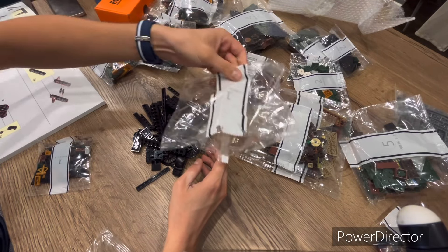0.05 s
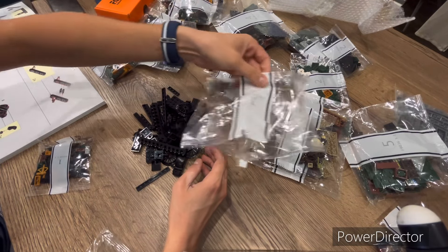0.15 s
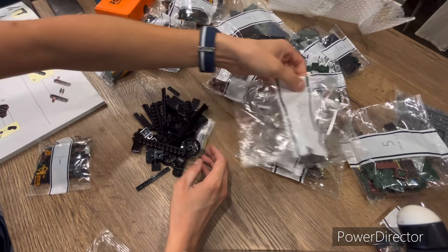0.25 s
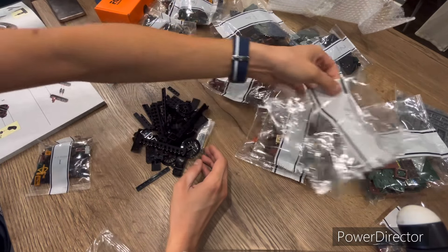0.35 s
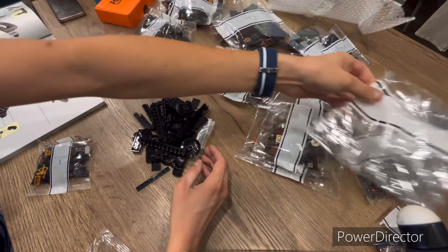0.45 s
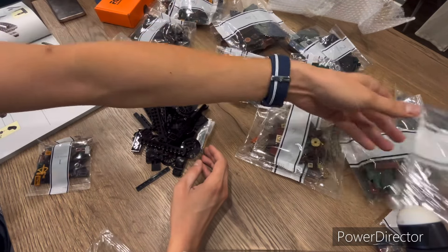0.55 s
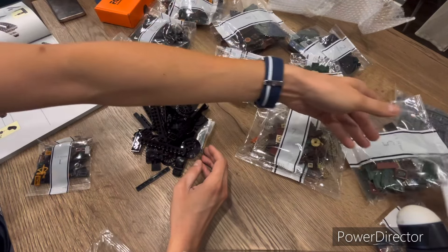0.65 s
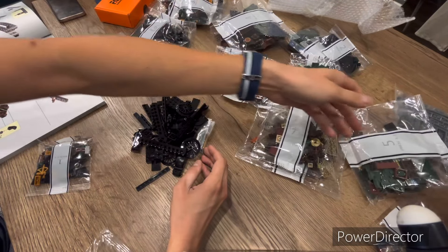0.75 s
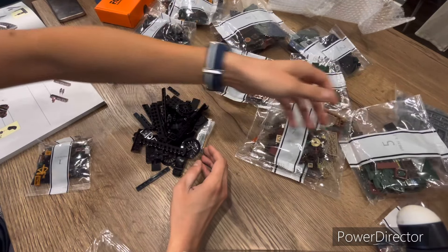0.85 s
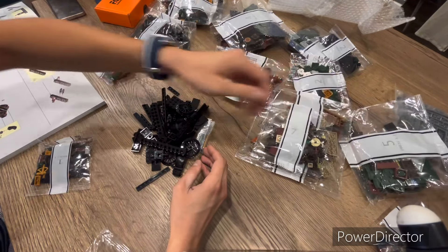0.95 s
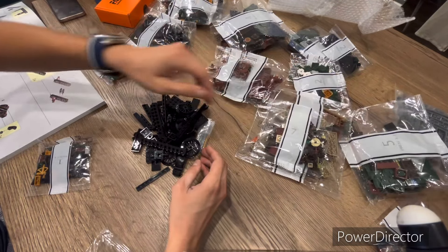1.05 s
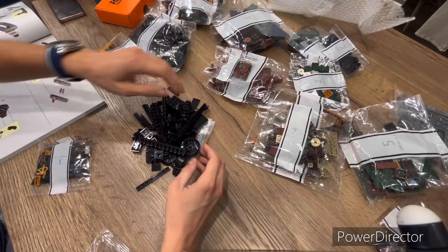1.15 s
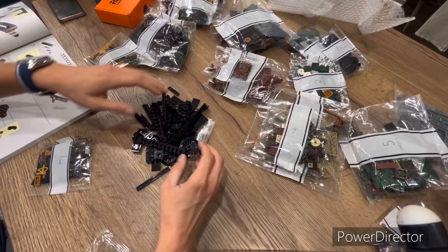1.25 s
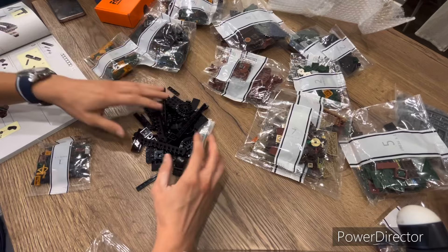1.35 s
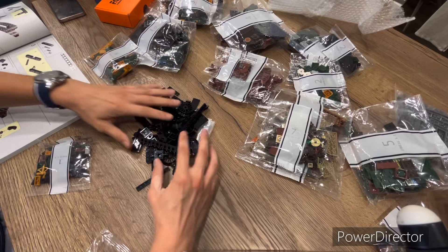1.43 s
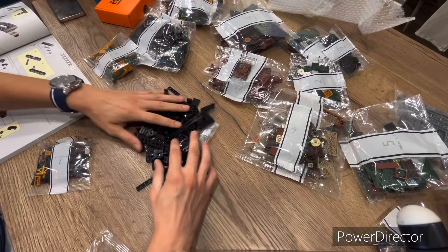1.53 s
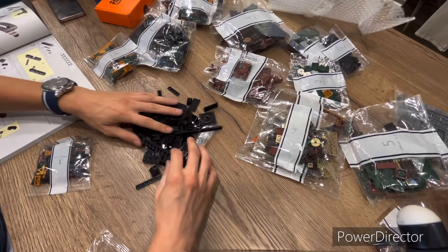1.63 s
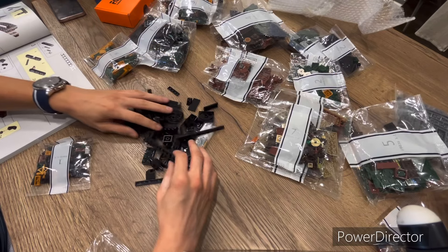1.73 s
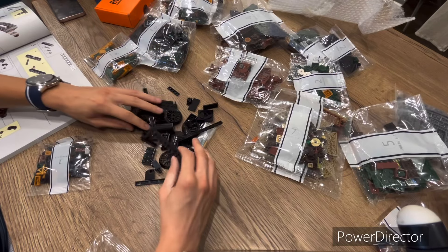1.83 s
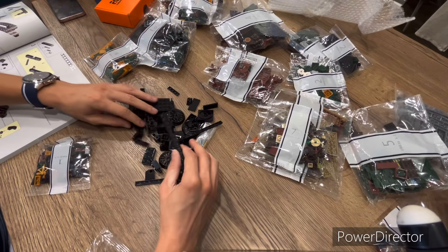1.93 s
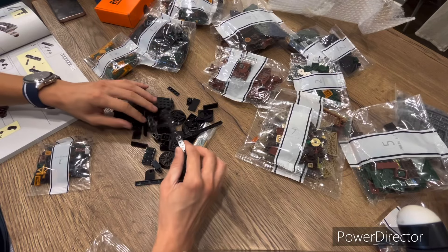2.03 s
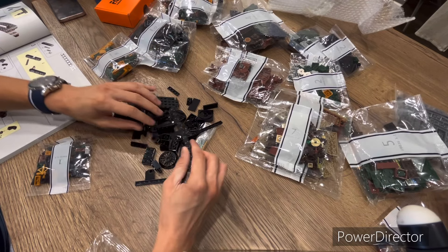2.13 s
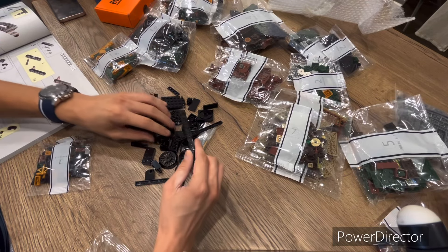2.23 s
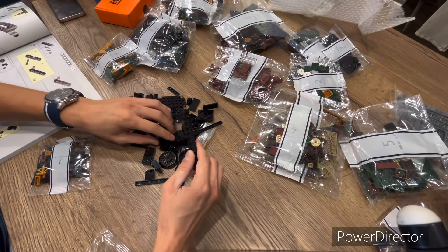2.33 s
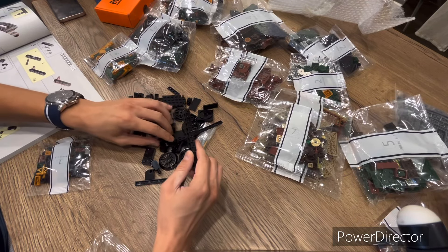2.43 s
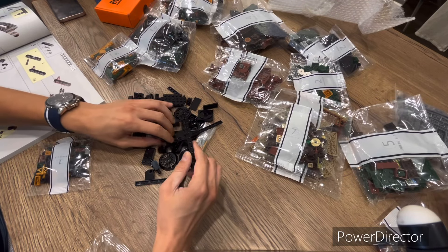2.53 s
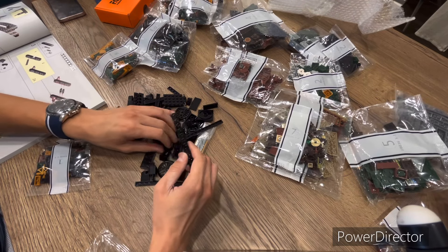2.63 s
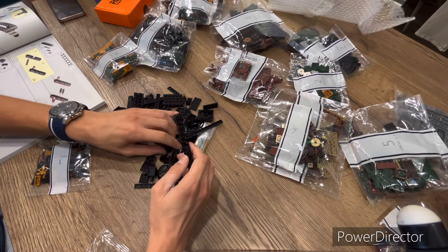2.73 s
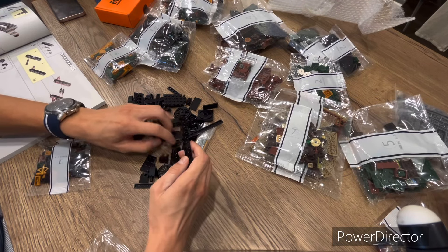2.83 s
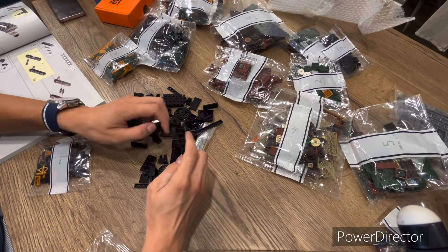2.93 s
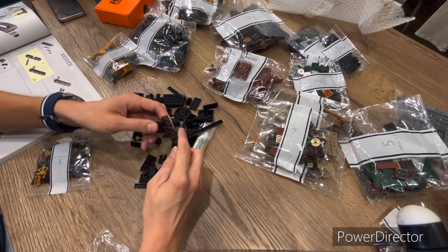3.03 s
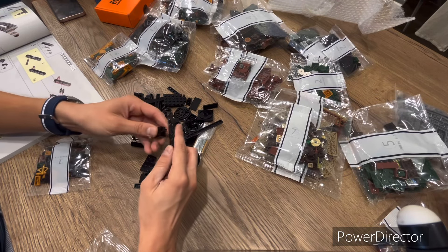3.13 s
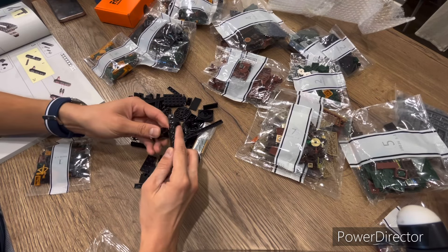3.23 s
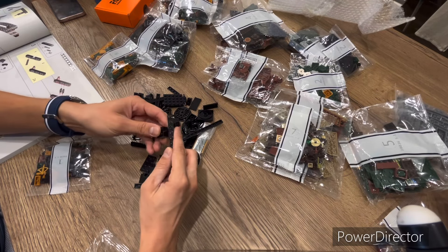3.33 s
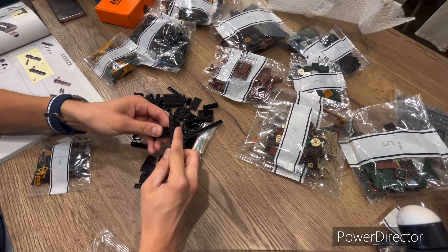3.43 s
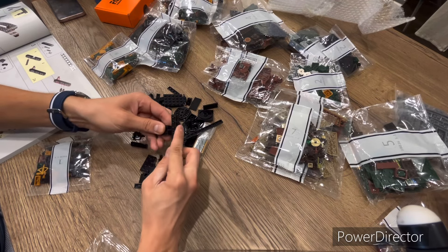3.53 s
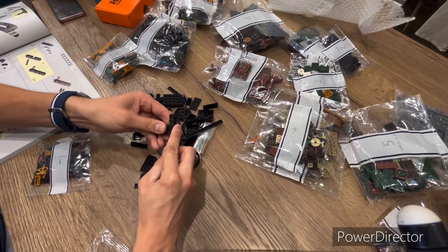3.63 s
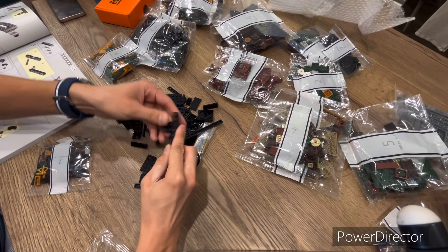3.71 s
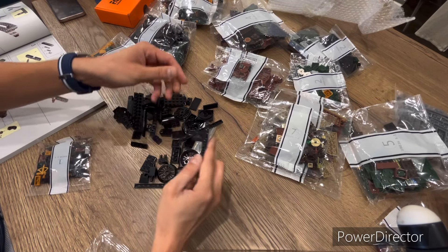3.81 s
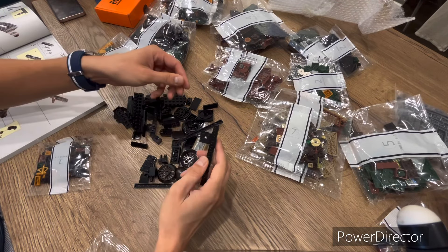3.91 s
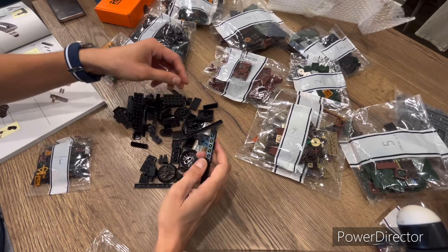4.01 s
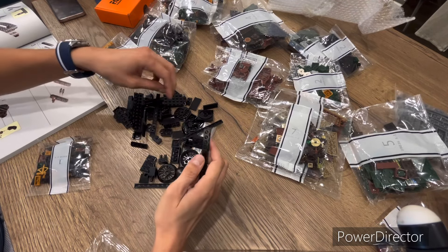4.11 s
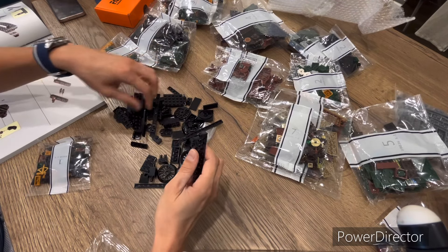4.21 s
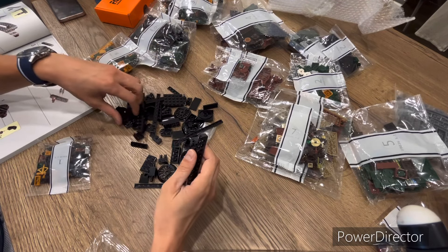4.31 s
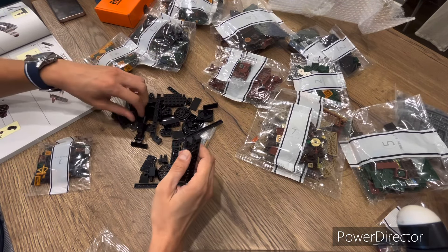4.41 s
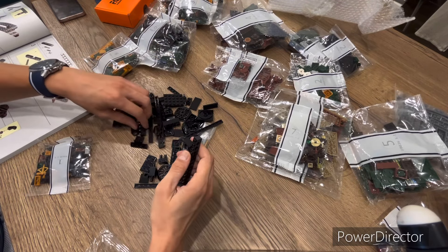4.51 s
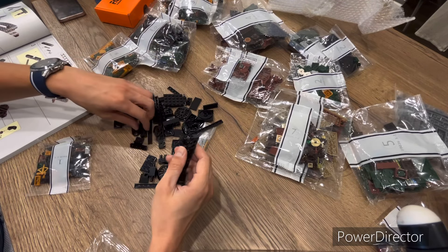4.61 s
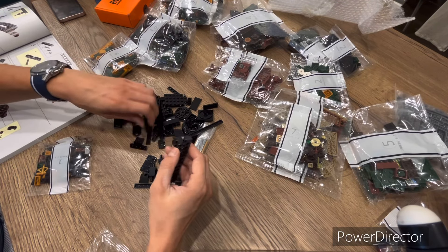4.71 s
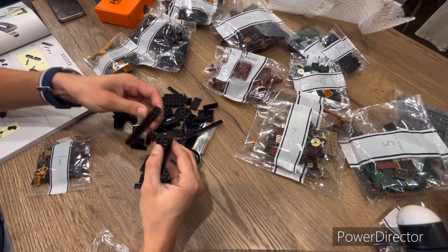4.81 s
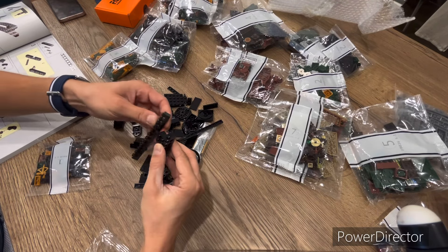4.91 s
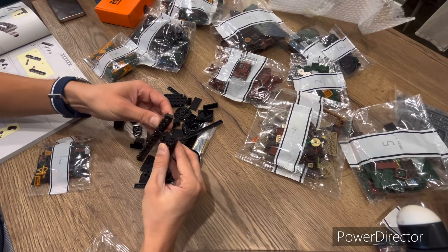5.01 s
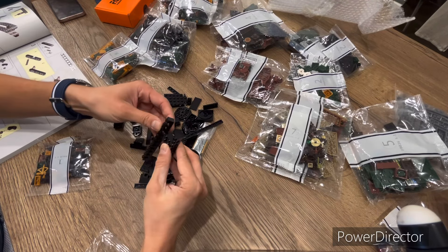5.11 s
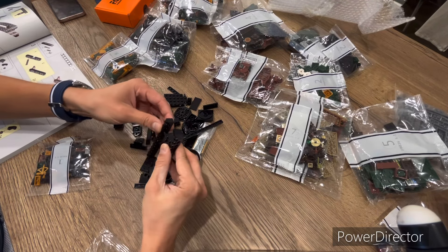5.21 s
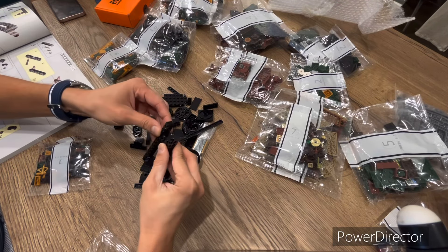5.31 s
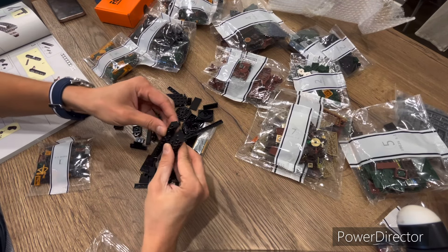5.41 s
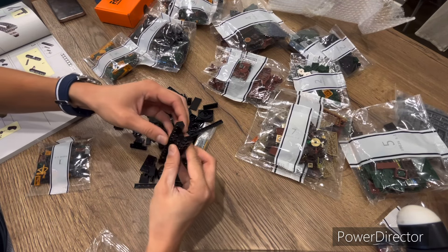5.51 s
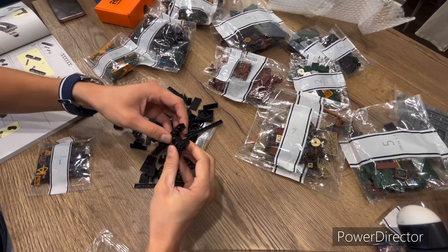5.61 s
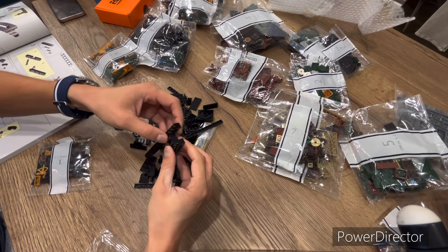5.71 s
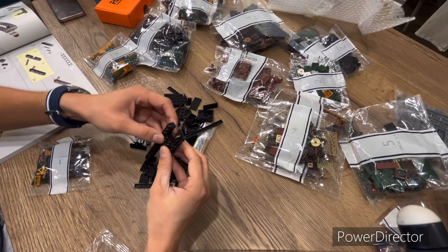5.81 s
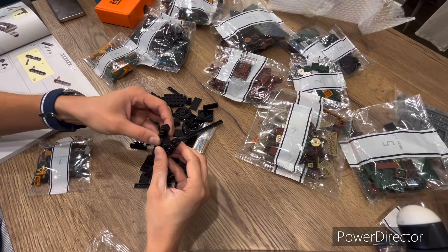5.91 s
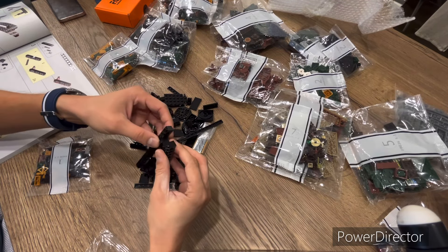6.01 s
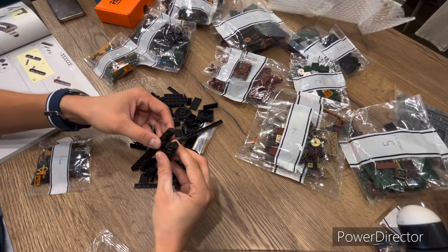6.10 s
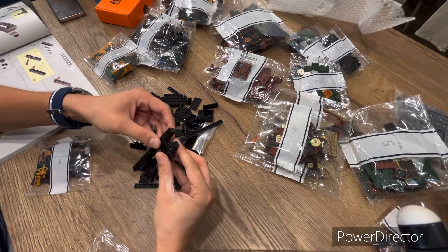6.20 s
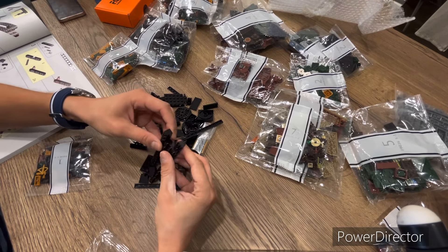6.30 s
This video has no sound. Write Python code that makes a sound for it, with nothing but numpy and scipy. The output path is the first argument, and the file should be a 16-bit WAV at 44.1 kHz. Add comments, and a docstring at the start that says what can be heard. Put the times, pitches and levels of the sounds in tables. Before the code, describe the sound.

Indoors, close to a wooden table, in a small room with a short diffuse tail. From 0 to 0.4 s an emptied thin plastic bag crackles in several sharp, crisp bursts; a dull tap at about 0.47 s and a soft low bump near 0.6 s follow, with more crinkling until 0.95 s. A lull holds only weak film rustles around 1.3 to 1.4 s. At about 1.55 s a hand pushes a heap of small hard plastic bricks apart: a dense, bright rattle with strong clicks until 2.0 s, then shorter, weaker pushes to 2.65 s. Light fingertip rakes tick until 3.0 s. Afterwards it is mostly quiet, with a clear click at 3.7 s, a small cluster of rattles at 4.4 to 4.8 s, a snap at 5.4 s and a faint bump at 5.7 s. Soft room air fades, leaving a faint wavering low hum.

```python
"""A heap of small plastic bricks is spread by hand over a wooden table, then picked through and clicked together:
bursts of tiny contacts excite ringing brick walls, cavities and the table top.
Before that an emptied plastic bag is flicked aside, its film crackling in avalanches of small buckles.
A small room answers with diffuse noise tails; shaped noise makes its air,
and a low drone, perhaps a far engine, wavers under it all as a tone with a weak octave."""
import sys
import numpy as np
from scipy import signal
from scipy.fft import rfft, irfft, next_fast_len
from scipy.io import wavfile
from scipy.ndimage import uniform_filter1d, map_coordinates

SR = 44100
rng = np.random.default_rng(int(sys.argv[2]) if len(sys.argv) > 2 else 0)


def wav_out(sig):
    """Save sig, one row per channel (or a flat mono array), as 16-bit PCM at SR to the path in sys.argv[1]."""
    wavfile.write(sys.argv[1], SR, np.round(np.clip(np.atleast_2d(sig).T, -1, 1) * 32767).astype(np.int16))


N = 280211  # length in samples


def amp(db):
    """Decibels to gain."""
    return 10 ** (np.asarray(db) / 20)


def unit(x):
    """Scale to rms 1."""
    return x / np.sqrt(np.mean(x ** 2) + 1e-20)


def along(points, hz):
    """Read a curve of (frequency, value) points on a log frequency axis."""
    point_hz, values = np.transpose(points)
    return np.interp(np.log(hz + 1), np.log(point_hz + 1), values)


def curves(rows):
    """One value per sample for each column after the time."""
    times, *columns = np.transpose(rows)
    return [np.interp(np.arange(N) / SR, times, column) for column in columns]


def wobble(rate):
    """A smooth random curve with rate knots a second."""
    knots = rng.standard_normal(int(N * rate / SR) + 4)
    return map_coordinates(knots, [np.arange(N) * rate / SR])


def filtered(x, response):
    """Shape the spectrum of x by a response given as a function of frequency."""
    n = x.shape[-1]
    padded = next_fast_len(n + 8192)
    spectrum = rfft(x, padded) * response(np.fft.rfftfreq(padded, 1 / SR))
    return irfft(spectrum, padded)[..., :n]


def band(x, colour, lo_hz=1, hi_hz=SR):
    """One band of x in the given colour, at rms 1; the edges fall 24 dB an octave."""
    def response(f):
        edges = (1 + (f / hi_hz) ** 8) * (1 + (lo_hz / (f + 1)) ** 8)
        return amp(along(colour, f)) / np.sqrt(edges)
    return unit(filtered(x, response))


def resonance(x, hz, q):
    """x heard through one damped resonance with a softened top, at rms 1."""
    def response(f):
        peak = 1j * f / (hz * hz - f * f + 1j * f * hz / q)
        return peak / (1 + (f / hz / 2) ** 4)
    return unit(filtered(x, response))


def add(out, x, s):
    """Mix x into out from time s on."""
    start = round(s * SR)
    x = x[:, max(-start, 0):N - start]
    out[:, max(start, 0):][:, :x.shape[1]] += x


def panned(x, db):
    """Tilt a pair of channels to the left by db."""
    return x * unit(amp([[db / 2], [-db / 2]]))


def contacts(n, rate, spread_db):
    """Random tiny impacts of unequal size, on average rate a second."""
    size = np.minimum(rng.standard_normal(n), 1.5)
    happens = rng.random(n) < rate / SR
    return happens * rng.choice([-1, 1], n) * amp(spread_db * size)


def ports(x, lead_ms, scatter):
    """A near sound reaches the left lead_ms early (negative: late); table and hands scatter it over a few ms."""
    t = np.arange(SR // 50) / SR
    paths = rng.standard_normal((2, len(t))) * amp(-60 * t / .02)
    paths /= np.linalg.norm(paths, axis=1, keepdims=True)
    sides = np.array([[1], [-1]])
    direct = filtered(x, lambda f: np.exp(1j * np.pi * f * lead_ms / 1000 * sides))
    scattered = signal.fftconvolve(x[None], paths, axes=1)[:, :len(x)]
    return unit(direct + scatter * scattered)


def swell(t, rise, fall):
    """Gain that rises to a peak at t = 0 and falls after it; rise and fall are 60 dB times."""
    return amp(60 * np.minimum(t / rise, -t / fall))


def gesture(start, length, rise, fall):
    """Gain of one move of the hand: attack, hold, release; rise and fall are 60 dB times."""
    t = np.arange(N) / SR - start
    return amp(-60 * (np.maximum(-t, 0) / rise + np.maximum(t - length, 0) / fall))


# how long the room rings: (frequency [Hz], 60 dB decay time [s])
ROOM_DECAY = [(200, .28), (2000, 0.18), (6000, 0.2), (12000, 0.13)]


def room(x, wet_db):
    """x plus a diffuse noise tail for each ear, drawn anew at each call; the top treble dies first."""
    hz, t, z = signal.stft(rng.standard_normal((2, SR // 4)), SR, nperseg=256)
    decay = amp(-60 * t / along(ROOM_DECAY, hz)[:, None])
    tail = signal.istft(z * decay, SR, nperseg=256)[1]
    tail = np.pad(tail, ((0, 0), (SR // 200, 0)))  # 5 ms before the tail starts
    wet = signal.fftconvolve(x, tail / np.linalg.norm(tail[0]), axes=1)[:, :x.shape[1]]
    return x + amp(wet_db) * panned(wet, db=1.5)


# room air: (time [s], rumble level [dB], murmur level [dB], hiss level [dB])
AIR_LEVELS = [(0, -51.5, -57, -57), (1.2, -53.5, -56.5, -70), (1.9, -53, -55.5, -73),
              (2.15, -61.5, -55.5, -74.5), (3.1, -62.5, -63, -84), (4.5, -64.5, -62, -86.5),
              (6.35, -64, -63, -79)]
# colours of the three layers: (frequency [Hz], level [dB])
RUMBLE_COLOUR = [(15, -29.5), (28, -19.5), (42, 3), (55, -8.5), (70, -7), (90, 4), (130, -2), (190, -5.5),
                 (280, -13), (450, -55.5)]
MURMUR_COLOUR = [(120, -29), (200, -8), (414, -3.5), (535, -4.5), (801, -8), (1050, -4), (1370, -10.5),
                 (2030, -15), (2170, -15), (5000, -44), (6500, -67.5), (11000, -120)]
HISS_COLOUR = [(800, -39.5), (2000, -6), (3000, -3.5), (4000, -7), (8000, -19.5), (11000, -30.5),
               (16000, -27)]


def air():
    """Room noise in three bands: the bass is nearly alike in both ears, and the hiss sinks, then lifts a little."""
    def noise(apart):
        return rng.standard_normal(N) + apart * rng.standard_normal((2, N))
    rumble_db, murmur_db, hiss_db = curves(AIR_LEVELS)
    rumble = panned(band(noise(apart=0.21), RUMBLE_COLOUR), db=-2.5)
    murmur = panned(band(noise(apart=1.9), MURMUR_COLOUR), db=3)
    hiss = panned(band(noise(apart=3), HISS_COLOUR), db=8.0)
    low = amp(rumble_db + 1.2 * wobble(11)) * rumble
    middle = amp(murmur_db + 2.1 * wobble(8.9)) * murmur
    return low + middle + amp(hiss_db) * hiss


# the drone: (time [s], pitch [Hz], level [dB])
DRONE_PATH = [(0.3, 56, -59), (0.9, 61, -61), (1.1, 50.5, -58), (1.47, 56, -59.5), (2.2, 54.3, -60.5),
              (2.47, 54.24, -54), (2.65, 55.57, -56), (3.04, 57.7, -45.5), (3.64, 60.2, -45.5),
              (4.6, 60, -45), (4.85, 59.1, -51.5), (5.26, 61.26, -44), (5.5, 56.4, -49), (6.35, 57.5, -52)]
# moments when the tone dips briefly: (time [s])
DIP_TIMES = [2.62, 3.385, 3.76, 3.97, 5.949]
DIP_DB, DIP_S = 14.5, 0.05  # depth, half width
OCTAVE_DB = -22  # relative to the tone, before its swell
OCTAVE_SWELL_AT, OCTAVE_SWELL_S, OCTAVE_SWELL_DB = 5.84, 0.54, 15.5  # time (s), half width (s), height


def drone():
    """A low wavering sine that dips briefly five times, with a weak octave that swells once."""
    t = np.arange(N) / SR
    def bell(s, width):
        return np.exp(-((t - s) / width) ** 2)
    hz, db = curves(DRONE_PATH)
    tone_db = db - DIP_DB * sum(bell(s, DIP_S) for s in DIP_TIMES)
    octave_db = db + OCTAVE_DB + OCTAVE_SWELL_DB * bell(OCTAVE_SWELL_AT, OCTAVE_SWELL_S)
    phase = 2 * np.pi * np.cumsum(hz + 0.22 * wobble(9.4)) / SR
    tone = amp(tone_db + 1.8 * wobble(14)) * np.sin(phase)
    octave = amp(octave_db + 2.0 * wobble(24)) * np.sin(2 * phase)
    return panned(np.sqrt(2) * (tone + octave), db=-3.0)


# the loose film rustles as it is moved: (time [s], length [s], level [dB])
RUSTLE_MOVES = [(0.01, .12, -53.5), (0.42, 0.14, -60.5), (0.86, 0.104, -46.5), (1.279, 0.075, -53)]
# colour of the bag's film, for rustles and crumples: (frequency [Hz], level [dB])
FILM_COLOUR = [(120, -1), (250, 8), (550, 4.5), (1100, 6), (1800, 4.5), (3100, -1.5), (4900, 2),
               (7700, -6.5), (10000, -5.5), (12000, -22), (16000, -15.5)]
RUSTLE_RISE_S, RUSTLE_FALL_S = 0.035, 0.43  # 60 dB times


def rustle():
    """Faint, dense buckles of the loose film, heard while it moves."""
    moving = sum(amp(db) * gesture(s, length, RUSTLE_RISE_S, RUSTLE_FALL_S) for s, length, db in RUSTLE_MOVES)
    buckles = ports(contacts(N, rate=5600, spread_db=3.0), lead_ms=-.3, scatter=0.97)
    return room(moving * band(buckles, FILM_COLOUR, lo_hz=895), wet_db=-6.5)


# crumples of the bag, levels nominal, body and fizz set the balance within each:
# (time [s], level [dB], body level [dB], fizz level [dB], pitch of the film [Hz])
BAG_CRUMPLES = [(0.0252, -27.5, -14, -8.5, 1380), (0.0851, -21.5, -11, -24, 1290),
                (0.0941, -23.5, -16, -3.5, 4420), (0.192, -39, -6.5, -31, 1370),
                (0.2753, -29.5, -28, -13.5, 2740), (0.3351, -31, -2.5, -9, 1720),
                (0.3707, -17.5, -17.5, -11, 2300), (0.6101, -27.5, -13, -13.5, 1100),
                (0.7161, -26, -8, -24, 880), (0.7414, -32, -12, -32, 870), (0.831, -22, -12, -10, 950),
                (0.8952, -34, 1.5, -2.5, 3920), (0.9277, -28.5, -22, -15.5, 1790),
                (1.3211, -35, -12, -8, 900), (1.3946, -32.5, -14.5, -18, 1870)]
CRUMPLE_PAN_DB = 1  # left over right


def bag():
    """Each crumple is an avalanche of tiny buckles, coloured by the patch of film that gives way."""
    out, t = np.zeros((2, N)), np.arange(-SR // 16, SR // 4) / SR
    for s, db, body_db, fizz_db, film_hz in BAG_CRUMPLES:
        avalanche = contacts(len(t), rate=3000, spread_db=3.5) * swell(t - .002, rise=0.056, fall=.08)
        buckles = ports(avalanche, lead_ms=-.3, scatter=1.0)
        crackle = amp(-6) * band(buckles, FILM_COLOUR, lo_hz=1850, hi_hz=5340)
        patch = resonance(buckles, film_hz, q=2.7)
        body = amp(body_db) * (patch + band(buckles, FILM_COLOUR, hi_hz=1720))
        fizz = amp(fizz_db) * band(buckles, FILM_COLOUR, lo_hz=6370)
        crumple = panned(crackle + body + fizz, CRUMPLE_PAN_DB)
        add(out, room(amp(db - 23.0) * crumple, wet_db=-8.5), s + t[0])
    return out


# short, dry taps: (time [s], peak level [dB], pitch [Hz])
BAG_TAPS = [(0.472, -39.5, 1150)]
TAP_T60_S = 0.01


def taps():
    """A brief, dull tap with no crackle, perhaps the bag touching down: a noise burst in a broad resonance."""
    out, t = np.zeros((2, N)), np.arange(SR // 20) / SR
    for s, db, hz in BAG_TAPS:
        burst = rng.standard_normal(len(t)) * amp(-60 * t / TAP_T60_S)
        knock = resonance(burst, hz, q=1.7)
        add(out, amp(db) * knock[None] / np.abs(knock).max(), s)
    return out


# soft bumps of hand and arm on the table: (time [s], peak level [dB], pitch [Hz], half width [s])
TABLE_BUMPS = [(0.617, -32.5, 45.1, 0.012), (4.383, -57.5, 524, 0.039), (4.61, -57.5, 435, 0.12),
               (5.714, -48, 144.7, 0.022), (5.721, -52, 326, 0.02)]


def bumps():
    """Soft pushes on the table top: sine pulses with a bell-shaped level and an unsteady phase."""
    out, t = np.zeros(N), np.arange(N) / SR
    for s, db, hz, width in TABLE_BUMPS:
        pulse = np.exp(-((t - s) / width) ** 2)
        out += amp(db) * pulse * np.sin(2 * np.pi * hz * (t - s) + 2.4 * wobble(hz / 2))
    return out


def ringing(modes):
    """A struck body of energy 1: decaying sines whose strengths vary randomly around those of its modes."""
    t = np.arange(SR // 8) / SR
    ring = sum(amp(db + rng.normal(0, 3.4) - 60 * t / t60) * np.sin(2 * np.pi * hz * t) for hz, db, t60 in modes)
    return ring / np.linalg.norm(ring)


# modes of a brick's walls: (frequency [Hz], level [dB], 60 dB decay time [s])
BRICK_WALLS = [(957.5, 1, .14), (1410, -9, .12), (1715, -4, .16), (3497, -1.5, 0.21), (4310, -2, 0.2),
               (4450, -4, .12), (4674, -8, 0.17), (4520, -10, .14), (5080, -8.5, 0.13), (6170, -7, 0.16),
               (6200, -7.5, .14), (7593, -11, .15), (7600, -11.5, .13), (8400, -2, .12)]


def rattle(rate, spread_db, ring_db, shared_db, count=30):
    """Bricks take turns to jostle: each contact is a dry tick plus the ring of its own piece and of brick walls."""
    out = np.zeros((2, N))
    for _ in range(count):
        own_hz = np.clip(5700 * np.exp(.42 * rng.standard_normal(size=4)), 900, 14000)
        own = ringing([(hz, 0, .04) for hz in own_hz])
        piece = amp(ring_db) * own + amp(shared_db) * ringing(BRICK_WALLS)
        piece[0] += 1  # the dry tick
        turns = amp(9 * np.minimum(wobble(22), 1.3))
        jostle = contacts(N, rate / count, spread_db) * turns
        lead_ms = 0.19 + 0.042 * rng.standard_normal()
        out += ports(signal.fftconvolve(jostle, piece)[:N], lead_ms, scatter=0.87)
    # the rattle is levelled over 50 ms, so that the stroke levels alone set its loudness
    power = uniform_filter1d(np.mean(out ** 2, axis=0), size=2200)
    return out / np.sqrt(np.abs(power) + 1e-6)


# stereo tilt of the heap: (frequency [Hz], left over right [dB])
HEAP_TILT = [(200, -4), (700, -2), (1300, 3.5), (2400, 0), (4400, 10), (8000, 1), (15000, -4)]


def strokes(moves, rise, fall, ticks, colour):
    """Moves of the hand: bright brick clatter over the duller answer of the table."""
    shapes = [(gesture(s, length, rise, fall), clatter_db, table_db) for s, length, clatter_db, table_db in moves]
    clatter = np.max([amp(db) * shape for shape, db, _ in shapes], axis=0)
    table = np.max([amp(db) * shape for shape, _, db in shapes], axis=0)
    halves = np.array([[.5], [-.5]])
    ticks = filtered(ticks, lambda f: amp(along(HEAP_TILT, f) * halves))
    return clatter * band(ticks, colour, lo_hz=2460) + table * band(ticks, colour, hi_hz=2370)


# the flat hand pushes the heap apart: (time [s], length [s], clatter level [dB], table level [dB])
HEAP_PUSHES = [(1.548, .03, -58, -43.5), (1.6, 0.39, -34.5, -42), (2.02, 0.15, -41, -48),
               (2.22, 0.056, -52, -54), (2.36, 0.076, -40.5, -47), (2.47, 0.17, -47.5, -51)]
# fingertips rake a few pieces: (time [s], length [s], clatter level [dB], table level [dB])
FINGER_RAKES = [(2.695, 0.027, -40, -49), (2.74, 0.021, -47.5, -53.5), (2.84, 0.036, -45.5, -53),
                (2.905, 0.064, -46, -56.5), (4.395, 0.1, -48.5, -60.5), (4.57, 0.05, -44, -48.5),
                (4.66, .1, -55.5, -62)]
# colours of the full heap and of picked pieces; single bricks use both: (frequency [Hz], level [dB])
HEAP_COLOUR = [(120, -24), (250, -21), (460, -10), (620, -12), (1000, -9), (2600, -10), (3400, -9),
               (4400, -7), (7000, -5.5), (10700, -3.5), (12000, -22.5), (16000, -10)]
PICKED_COLOUR = [(150, -36.5), (280, -19.5), (480, -5), (700, -6.5), (1050, -5), (1700, -6), (2300, -11.5),
                 (3500, -4.5), (5800, -2.5), (7500, -4.5), (9200, -4.5), (10000, -40), (11500, -57)]
PUSH_RISE_S, PUSH_FALL_S = 0.13, 0.12  # 60 dB times
RAKE_RISE_S, RAKE_FALL_S = 0.087, 0.09  # 60 dB times


def heap():
    """Pushing moves the whole heap in a dense rattle, raking only a few pieces in a sparser one."""
    dense = rattle(rate=2400, spread_db=1.0, ring_db=1, shared_db=-15.5)
    sparse = rattle(rate=1500, spread_db=1.5, ring_db=-1.5, shared_db=-29)
    pushes = strokes(HEAP_PUSHES, PUSH_RISE_S, PUSH_FALL_S, dense, HEAP_COLOUR)
    rakes = strokes(FINGER_RAKES, RAKE_RISE_S, RAKE_FALL_S, sparse, PICKED_COLOUR)
    return room(pushes, wet_db=-3.5) + room(rakes, wet_db=-6)


# single bricks that strike, levels nominal, the later ones set the balance within each click:
# (time [s], level [dB], table knock level [dB], cavity pitch [Hz], cavity level [dB], wall ring level [dB])
BRICK_CLICKS = [(1.596, -19.5, 0, 4370, -18, -7.5), (1.707, -22.5, -3, 5800, -0.5, -11),
                (1.783, -28, -13, 4500, 7, -10.5), (1.839, -16, -34, 4160, -23, -2),
                (1.913, -30, -26, 7540, 15, -11), (1.969, -15.5, 0.5, 3580, -3, -7.5),
                (1.977, -19.5, -3, 3500, -8, -2), (2.103, -27.5, -10, 9300, -1.5, -13),
                (2.264, -34.5, -29, 2380, 2, 0), (2.356, -34.5, -22, 6660, 10, -9.5),
                (2.41, -31.5, -5, 4490, -6, -23), (2.512, -26.5, -31, 4510, -5, -30),
                (2.647, -35, -20, 11530, 2.5, -15.5), (2.701, -28.5, -27, 4540, 1.5, -30),
                (2.83, -33, -33, 4390, -1, 4), (3.259, -53, 13, 1700, 11.5, -27),
                (3.641, -49.5, -0.5, 4567, 2, -14.5), (3.685, -24, -15.5, 3500, 1, -31.5),
                (3.869, -63.5, 15.5, 1615, 12.5, -15), (4.451, -37, 1, 5310, -4.5, -15.5),
                (4.499, -36, -29, 3670, -7, -29), (4.564, -26, -11, 6850, -33, -35),
                (4.616, -24.5, -14, 4180, -9, -19), (4.726, -37, -15, 9350, -15, -27),
                (4.819, -50, 0, 5010, -14.5, -18), (5.152, -54.5, 1, 4350, -2, -26),
                (5.418, -25, -17, 4370, -8, -31), (5.644, -66.5, -1, 5520, -4, -16.5),
                         (6.175, -60.5, 17.5, 2430, 15, -21.5)]
CLICK_PAN_DB = 5  # left over right


def clicks():
    """A brick clicks: a short burst of contacts with a soft onset sounds its cavity and walls and knocks the table."""
    out, t = np.zeros((2, N)), np.arange(-SR // 16, SR // 4) / SR
    for s, db, knock_db, cavity_hz, cavity_db, wall_db in BRICK_CLICKS:
        burst = contacts(len(t), rate=5000, spread_db=7.0) * swell(t - .002, rise=0.06, fall=0.071)
        body = amp(wall_db) * ringing(BRICK_WALLS)
        body[0] += 1  # the dry tick
        hit = ports(signal.fftconvolve(burst, body)[:len(t)], lead_ms=0.2, scatter=0.69)
        # small, high cavities are tuned more sharply than wide, low ones
        cavity = amp(cavity_db) * resonance(hit, cavity_hz, q=cavity_hz / 340)
        knock = amp(knock_db) * band(hit, HEAP_COLOUR, hi_hz=2300)
        click = panned(band(hit, PICKED_COLOUR, lo_hz=2280) + cavity + knock, CLICK_PAN_DB)
        add(out, room(amp(db - 26.5) * click, wet_db=-14.0), s + t[0])
    return out


def scene():
    """Air and drone under the bag, the bumps, the heap and the single bricks."""
    return air() + drone() + rustle() + bag() + taps() + bumps() + heap() + clicks()


def record(dry):
    """A steep low-pass: nothing passes much above 15.9 kHz."""
    top_hz = 15900
    return filtered(dry, lambda hz: np.clip((top_hz - hz) / 300 + .5, 0, 1))


dry = scene()
out = record(dry)
wav_out(out)
```